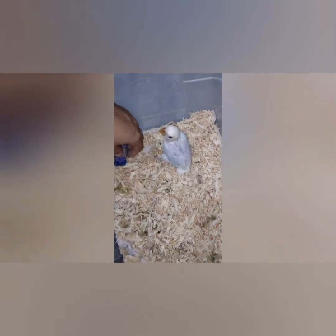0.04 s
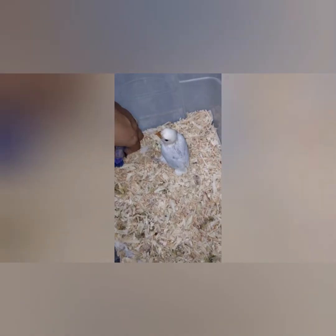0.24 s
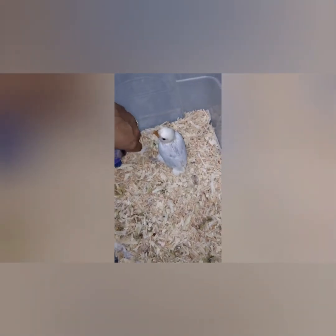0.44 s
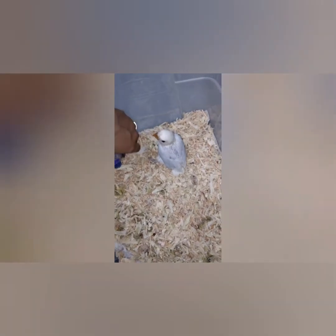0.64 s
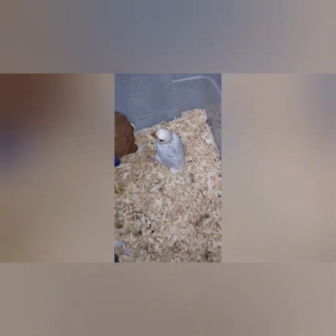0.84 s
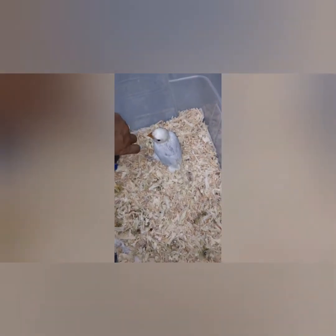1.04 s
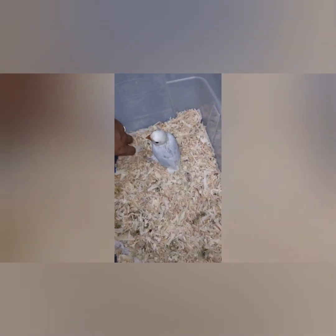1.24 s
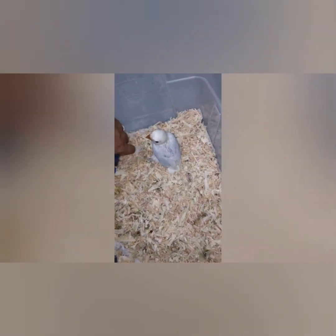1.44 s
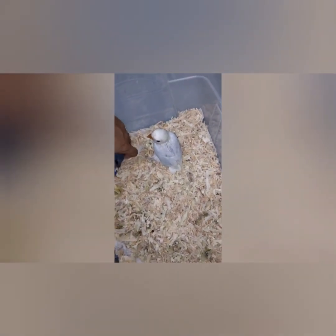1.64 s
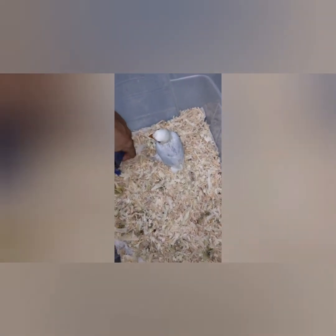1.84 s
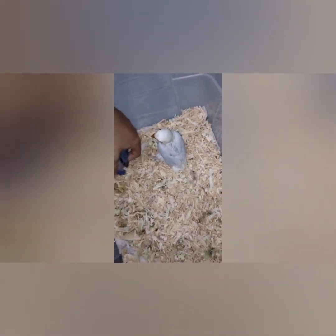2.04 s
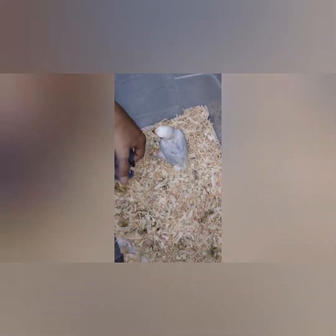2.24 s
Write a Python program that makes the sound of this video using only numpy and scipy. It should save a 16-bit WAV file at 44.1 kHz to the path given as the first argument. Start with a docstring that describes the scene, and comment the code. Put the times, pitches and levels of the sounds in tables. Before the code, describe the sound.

One short raspy parrot chick squawk echoes indoors, then tiny peeps, soft knocks and rustling wood shavings

```python
"""One harsh parrot screech rings across a hard-walled room, and a chick in a plastic box peeps four times.
A hand knocks the box and stirs wood shavings; a far horn toots twice over rumble and hiss, in stereo.
The screech is two unsteady pitches, their products and rasp; peeps and toots are stacks of sines.
Knocks are decaying sines, wood chips are noise puffs, shavings are noise grains and the air is shaped noise.
Each microphone has its own arrival times and echoes."""
import sys
import numpy as np
from scipy import signal
from scipy.fft import rfft, irfft
from scipy.io import wavfile
from scipy.ndimage import uniform_filter1d

SR = 44100
rng = np.random.default_rng(int(sys.argv[2]) if len(sys.argv) > 2 else 0)


def decibels_to_gain(level_db):
    """Convert a level in decibels to a linear amplitude gain (20 dB per decade)."""
    exponent = np.asarray(level_db, float) / 20
    return 10 ** exponent


def store_pcm(level_fs):
    """Save levels as 16-bit WAV."""
    pcm = np.round(np.clip(level_fs, -1, 1) * 32767).astype(np.int16)
    wavfile.write(sys.argv[1], SR, np.atleast_2d(pcm).T)


N = 101429  # length [samples]

# Two halves of the parrot's voice box:
# (time [s], low side pitch [Hz], low side level [dB], high side pitch [Hz], high side level [dB])
VOICE_SIDES = [(.18, 1699, -40, 2287, -77), (0.187, 1771, -38.5, 2295, -56), (.2, 1884, -28, 2323, -48),
               (0.218, 1887, -29, 2303, -23.5), (0.227, 1895, -26.5, 2310, -24.5),
               (0.249, 1906, -43.5, 2304, -24.5), (.27, 1883, -19.5, 2271, -30.5),
               (0.283, 1890, -33.5, 2136, -25.5), (0.306, 1897, -37.5, 2172, -50),
               (0.355, 1909, -31.5, 2100, -90)]
# Low side, one row per overtone: (level as the beak opens [dB], level once open [dB])
LOW_OVERTONES = [(-21, -25), (-7, -14), (-2, 9), (5, -15), (-8.5, -27), (-2, -1), (-8, -24)]
# High side, one value per overtone: (level [dB])
HIGH_OVERTONES = [-9, -3.5, 5.5, 1, -1, -13]
# Colour of the rasp and of the mixed tones: (frequency [Hz], level [dB])
RASP_COLOUR = [(1500, -31), (2200, -13.5), (3000, -12), (3600, -12.5), (4300, -4), (5100, -5), (6200, -5.5),
               (7800, -8), (8600, -3.5), (10500, -8.5), (12000, -17.5), (13500, -34), (15500, -50)]
# Throat filter over the whole screech: (frequency [Hz], gain [dB])
THROAT_GAIN = [(1200, -49), (1700, -9), (1950, -1), (2450, -3), (2750, -22), (3450, -22), (3900, -4),
               (14000, -0.5), (15000, -15)]
# Chick's notes: (start [s], length [s], level [dB], first pitch [Hz], last pitch [Hz],
# first slope [dB per overtone], last slope [dB per overtone], beak resonance [Hz], its boost [dB],
# level change in the second half [dB])
PEEP_NOTES = [(.1365, 0.026, -48, 1290, 1520, -3, -4, 2650, 7, -4),
              (0.924, 0.022, -42, 1325, 1500, -4, -1.5, 4550, 9, -3),
              (1.634, 0.019, -50, 1370, 1430, -6, -6, 5700, 9, 0),
              (2.283, 0.024, -45, 1285, 1460, -3, -2, 5150, 9, -8)]
# Touches on the box: (time [s], level [dB], tick against thud [dB], pitch factor of the spot, press [s])
BOX_KNOCKS = [(.883, -37, -23, 1.03, 0.01), (0.9024, -49, -20, 0.963, 0.014),
              (1.207, -43.5, -9.5, 1.06, 0.011), (1.694, -40.5, -2, 1.003, 0.0085),
              (1.997, -54, -3, 0.98, 0.042)]
# Modes of the box, before the spot's pitch factor: (frequency [Hz], level [dB], 60 dB decay [s])
BOX_MODES = [(129.2, -6.5, 0.22), (317.2, 3, 0.02), (698, -1.5, 0.034), (980, -3, 0.029),
             (1600, -10, 0.019), (2100, -10.5, 0.012)]
# Snapping wood chips: (time [s], level [dB], centre [Hz], 60 dB decay [s], width [octaves])
CHIP_SNAPS = [(.128, -56.5, 9200, 1, .6), (.664, -50, 1310, 0.029, 0.49), (.842, -50, 1600, 0.028, 1.3),
              (0.919, -41, 970, 0.014, 0.55), (1.071, -42, 2200, 0.0083, 1.6),
              (1.276, -45, 10500, 0.053, .9), (1.446, -50.5, 5000, 0.12, 2.2),
              (1.591, -38, 1070, 0.021, 0.3), (1.814, -45.5, 10500, 0.02, 0.54),
              (1.913, -38, 1040, 0.016, 0.28), (1.985, -41, 6000, 0.016, 1.9),
              (1.9955, -39, 1510, 0.016, 1.5), (2.02, -42.5, 1030, 0.028, 0.85),
              (2.048, -46, 1060, 0.024, 0.68), (2.13, -55, 890, 0.037, 0.59)]
# Hand in the shavings: (time [s], fine chips level [dB], scrape on the box floor level [dB])
STIRRING = [(0.55, -80, -61), (0.642, -82, -64), (0.666, -56.5, -58), (0.744, -71.5, -91), (0.85, -58, -57),
            (0.87, -90, -56.5), (0.938, -55.5, -57.5), (0.954, -85, -60.5), (1.016, -61.5, -59),
            (1.186, -54, -61.5), (1.22, -69, -55), (1.274, -60, -69), (1.328, -56.5, -58.5),
            (1.368, -58, -76), (1.425, -55.5, -55.5), (1.796, -55.5, -58.5), (1.898, -61, -76),
            (1.912, -54, -69), (1.978, -59.5, -67), (1.997, -47, -47), (2.064, -62.5, -67),
            (2.288, -60, -86)]
# Colour of the fine chips: (frequency [Hz], level [dB])
CHIP_COLOUR = [(1500, -57.5), (2500, -14.5), (4500, -9.5), (6500, -13.5), (9000, -6), (10500, -4),
               (12500, -13), (15500, -15)]
# Colour of the scrape: (frequency [Hz], level [dB])
SCRAPE_COLOUR = [(250, -49), (500, -1), (800, -5), (1100, -1.5), (1700, -7.5), (2600, -10.5), (4000, -21)]
# Far horn: (start [s], length [s], level [dB])
HORN_TOOTS = [(0.6, 0.08, -63), (0.766, 0.116, -60)]
# Horn, one value per overtone: (level [dB])
HORN_OVERTONES = [-6, -4, 0, -9]
# Colour of the room's rumble and hiss: (frequency [Hz], level [dB])
AIR_COLOUR = [(30, -15), (42, 5.5), (55, 9), (110, -2.5), (190, -7.5), (225, -5), (330, -9), (530, -13.5),
              (800, -20), (1300, -18), (2150, -23.5), (5000, -31.5), (9500, -30), (15500, -40.5)]
# Likeness of the air at the two microphones: (frequency [Hz], correlation [-1 to 1])
MIC_LIKENESS = [(60, 0.72), (180, 0.81), (550, 0.5), (1650, -0.21), (4970, -0.18), (15000, -0.85)]
# Slow pressure of moving air: (frequency [Hz], level [dB])
SWAY_COLOUR = [(2, -31), (6, -11.5), (13, -1), (24, -3), (60, -48.5)]
# Decay of the hard-walled room: (frequency [Hz], 60 dB decay [s])
ROOM_DECAY = [(300, 0.48), (2000, 0.54), (5000, 0.52), (8000, 0.37), (13000, 0.42)]


def evened(x):
    """Scales a sound to an rms of one."""
    return x / np.sqrt(np.mean(x ** 2) + 1e-20)


def read(points, hz):
    """Reads a curve between its points on a log frequency axis."""
    f, value = np.transpose(points)
    return np.interp(np.log(hz + 1), np.log(f + 1), value)


def add(mix, start_s, sound):
    """Lays a sound into the mix, cut where the mix ends."""
    part = mix[..., round(start_s * SR):][..., :sound.shape[-1]]
    part += sound[..., :part.shape[-1]]


def filtered(x, points):
    """Filters by a gain curve in dB."""
    count = x.shape[-1]
    gain = decibels_to_gain(read(points, np.fft.rfftfreq(count, 1 / SR)))
    return irfft(rfft(x) * gain, count)


def coloured(x, points):
    """Filters by a spectrum in dB and evens the result."""
    return evened(filtered(x, points))


def slow_noise(cutoff_hz, count):
    """Random wander below a cutoff, with an rms of one."""
    return evened(signal.lfilter(*signal.butter(2, cutoff_hz, fs=SR), rng.standard_normal(count)))


def band(x, low_hz, high_hz):
    """Passes one band of frequencies."""
    return signal.lfilter(*signal.butter(2, [low_hz, high_hz], "band", fs=SR), x)


def overtones(hz, levels_db):
    """A stack of sines on the pitch curve, each from a random phase."""
    turns = np.cumsum(hz) / SR
    stack = 0
    for k, db in enumerate(levels_db):
        stack = stack + decibels_to_gain(db) * np.sin(2 * np.pi * ((k + 1) * turns + rng.random()))
    return evened(stack)


def screech():
    """Two unsteady pitches at once, their sum and difference tones and fluttering rasp pass the throat."""
    jitter_hz, low_jitter, high_jitter = 150, .012, .02  # cutoff, then rms share of the pitch
    flutter_hz, flutter_db = 130, 3.5
    coupling_db, rasp_db = 1, -1.5  # each side shakes the other
    open_s = .26  # beak fully open
    s, low_hz, low_db, high_hz, high_db = np.transpose(VOICE_SIDES)
    t = np.arange(s[0], s[-1], 1 / SR)
    low_pitch = np.interp(t, s, low_hz) * (1 + low_jitter * slow_noise(jitter_hz, len(t)))
    high_pitch = np.interp(t, s, high_hz) * (1 + high_jitter * slow_noise(jitter_hz, len(t)))
    flutter = decibels_to_gain(flutter_db * slow_noise(flutter_hz, len(t)))

    opened = np.clip((t - s[0]) / (open_s - s[0]), 0, 1) ** 2
    low = overtones(low_pitch, [first + (last - first) * opened for first, last in LOW_OVERTONES])
    high = overtones(high_pitch, HIGH_OVERTONES)
    low_level = decibels_to_gain(np.interp(t, s, low_db))
    high_level = decibels_to_gain(np.interp(t, s, high_db))

    # multiplying the two sides gives the sum and difference tones
    mixed = decibels_to_gain(coupling_db) * np.sqrt(low_level * high_level) * coloured(low * high, RASP_COLOUR)
    noise = coloured(rng.standard_normal(len(t)), RASP_COLOUR)
    rasp = decibels_to_gain(rasp_db) * np.hypot(low_level, high_level) * noise
    out = np.zeros(N)
    add(out, s[0], low_level * low + flutter * (high_level * high + mixed + rasp))
    return filtered(out, THROAT_GAIN)


def peeps():
    """Short, slightly shaky notes that step up in pitch halfway, past a resonance of the beak."""
    beak_width_hz, shake_db = 450, 1.8
    out = np.zeros(N)
    for s, length, db, first_hz, last_hz, first_db, last_db, beak_hz, beak_db, late_db in PEEP_NOTES:
        u = np.arange(0, length, 1 / SR) / length  # 0 to 1 along the note
        step = 1 / (1 + np.exp(-(u - .5) / 0.048))
        hz = first_hz + (last_hz - first_hz) * step
        slope = first_db + (last_db - first_db) * step
        shake = evened(uniform_filter1d(rng.standard_normal((5, len(u))), size=120, axis=1))
        levels = []
        for k, wobble in enumerate(shake):
            beak = beak_db / (1 + (((k + 1) * hz - beak_hz) / beak_width_hz) ** 2)
            levels.append(k * slope + beak + shake_db * wobble)
        fade = np.minimum(u / 0.12, 1) * np.minimum((1 - u) / 0.067, 1)
        dip = 1 - 1.56 * step * (1 - step)  # softer around the pitch step
        add(out, s, decibels_to_gain(db + late_db * step) * fade * dip * overtones(hz, levels))
    return out


def knocks():
    """The plastic box thuds, rings on while the finger presses, then damps; each touch has its own tick level."""
    tick_t60_s, upper_modes_db = .016, 12
    out, t = np.zeros(N), np.arange(6000) / SR
    for s, db, tick_db, spot, press in BOX_KNOCKS:
        released = np.maximum(t - press, 0)
        ring = 0
        for hz, mode_db, t60 in BOX_MODES:
            fading = released if hz < 500 else t  # only the low modes are held up by the press
            level = mode_db + (tick_db + upper_modes_db) * (hz > 1200) - 60 * fading / t60
            ring = ring + decibels_to_gain(level) * np.sin(2 * np.pi * hz * spot * t)
        tick = decibels_to_gain(tick_db - 60 * t / tick_t60_s) * band(rng.standard_normal(len(t)), 900, 4500)
        onset = np.minimum(t / .0006, 1)
        add(out, s, -decibels_to_gain(db) * (ring + 4 * tick) * onset)
    return out


def ticks():
    """Chips of wood snap: short noise puffs round one pitch, separate at each microphone."""
    out, t = np.zeros((2, N)), np.arange(3000) / SR
    for s, db, hz, t60, octaves in CHIP_SNAPS:
        half = 2 ** (octaves / 2)
        puff = evened(band(rng.standard_normal((2, len(t))), hz / half, min(hz * half, 17000)))
        onset = np.minimum(t / .0004, 1)
        add(out, s, decibels_to_gain(db - 60 * t / t60) * puff * onset)
    return out


def shavings():
    """Clumped dry grains over a thin bed of noise, fine and coarse, follow the stirring."""
    grains_per_s, grain_spread_db, clump_db = 2000, 3, 2.2
    s, *levels = np.transpose(STIRRING)
    out = np.zeros((2, N))
    for db, colour in zip(levels, (CHIP_COLOUR, SCRAPE_COLOUR)):
        clumps = decibels_to_gain(clump_db * evened(uniform_filter1d(rng.standard_normal(N), size=900)))
        size = decibels_to_gain(grain_spread_db * np.minimum(rng.exponential(1, (2, N)), 4))
        hits = size * (rng.random((2, N)) < grains_per_s / SR)
        grains = coloured(clumps * (hits + 0.39) * rng.standard_normal((2, N)), colour)
        out += decibels_to_gain(np.interp(np.arange(N) / SR, s, db, left=-75)) * grains
    return out


def horn():
    """Two faint toots: steady stacks of sines with short fades."""
    pitch_hz, fade_s = 417, 0.01
    out = np.zeros(N)
    for s, length, db in HORN_TOOTS:
        t = np.arange(0, length, 1 / SR)
        fade = np.minimum(np.minimum(t, length - t) / fade_s, 1)
        add(out, s, decibels_to_gain(db) * fade * overtones(pitch_hz + 0 * t, HORN_OVERTONES))
    return out


def air():
    """Rumble and hiss from shaped noise, most alike at both microphones in the bass, in drifting patches."""
    level_db, patch_db = -51.5, 2.43
    frames, hz = N // 512 + 5, np.fft.rfftfreq(2048, 1 / SR)
    a, b, c, d, patches = rng.standard_normal((frames, 1025, 5)).T
    patches = uniform_filter1d(patches, 16, axis=0)  # across frequency
    patches = evened(uniform_filter1d(patches, 6, axis=1))  # across time
    same = np.clip(read(MIC_LIKENESS, hz), -1, 1)[:, None]
    left = a + 1j * b
    right = same * left + np.sqrt(1 - same ** 2) * (c + 1j * d)
    shape_db = read(AIR_COLOUR, hz)[:, None] + patch_db * patches * (hz[:, None] > 150)
    z = np.array([left, right]) * decibels_to_gain(shape_db)
    return decibels_to_gain(level_db) * evened(signal.istft(z, nperseg=2048, noverlap=1536)[1][:, :N])


def sway():
    """Very low pressure wobble of moving air: a common part and a smaller part opposed at the microphones."""
    level_db, apart = -50, 0.62
    common, opposed = rng.standard_normal((2, N))
    pair = np.array([common + apart * opposed, common - apart * opposed])
    return decibels_to_gain(level_db) * coloured(pair, SWAY_COLOUR)


def walls(x):
    """Direct sound and eight early echoes, other ones for each microphone."""
    echoes_db, span_s = -9, .004
    taps = np.zeros((2, round(span_s * SR)))
    at = rng.integers(40, taps.shape[1], (2, 8))
    echoes = decibels_to_gain(echoes_db) * rng.choice([-1., 1.], (2, 8)) / np.sqrt(8)
    np.put_along_axis(taps, at, echoes, 1)
    taps[[0, 1], [2, 0]] = 1  # direct sound, two samples later on the left
    return signal.fftconvolve(x[None], taps, axes=1)[:, :N]


def room(x):
    """Sparse echoes of random sign, each band dying at its own speed."""
    taps = np.zeros((2, SR))
    at = np.arange(200, SR - 20, 10) + rng.integers(0, 10, (2, (SR - 211) // 10))
    np.put_along_axis(taps, at, rng.choice([-1., 1.], at.shape), 1)
    hz, t, z = signal.stft(taps, SR, nperseg=256)
    fading = decibels_to_gain(-60 * t / read(ROOM_DECAY, hz)[:, None])
    tail = signal.istft(z * fading, SR, nperseg=256)[1]
    return signal.fftconvolve(x[None], tail / np.linalg.norm(tail[0]), axes=1)[:, :N]


def two_mics(x, lag):
    """Sends a sound to both microphones, the right one lag samples after the left."""
    return np.array([x, np.roll(x, lag)])


def scene():
    """Places the sources before two microphones in the room and adds the close chips and the air."""
    parrot, chick, box, toots = screech(), peeps(), knocks(), horn()
    # the box keeps the upper overtones of the peeps from the room
    dull_chick = signal.lfilter(*signal.butter(1, 2200, fs=SR), chick)
    wet = room(decibels_to_gain(2) * parrot + decibels_to_gain(-5) * dull_chick + decibels_to_gain(-10) * box + decibels_to_gain(1) * toots)
    direct = decibels_to_gain(-6.5) * two_mics(parrot, lag=-14) + walls(chick)
    direct = direct + two_mics(box, lag=3) + two_mics(toots, lag=12)
    left_over_right_db = -0.5
    pan = decibels_to_gain(np.array([[left_over_right_db], [-left_over_right_db]]) / 2)
    return (wet + direct) * pan + ticks() + shavings() + air() + sway()


def low_pass(x):
    """Removes everything above the highest recorded frequency."""
    return signal.sosfilt(signal.butter(12, 15780, fs=SR, output="sos"), x)


def record(dry):
    """Takes down the finished mix."""
    return low_pass(dry)


dry = scene()
out = record(dry)
store_pcm(out)
```